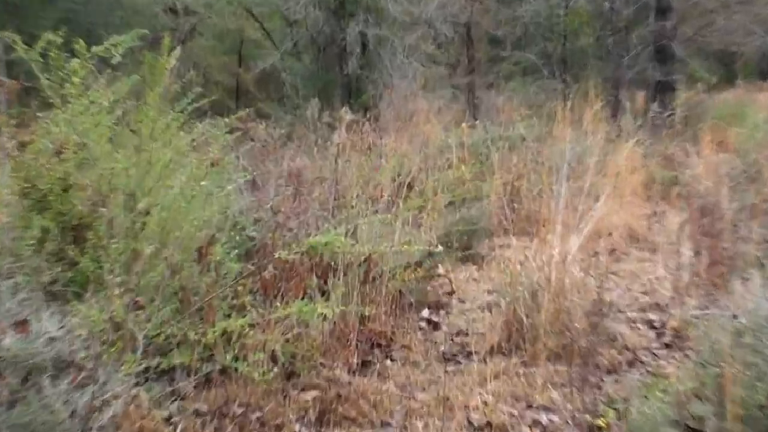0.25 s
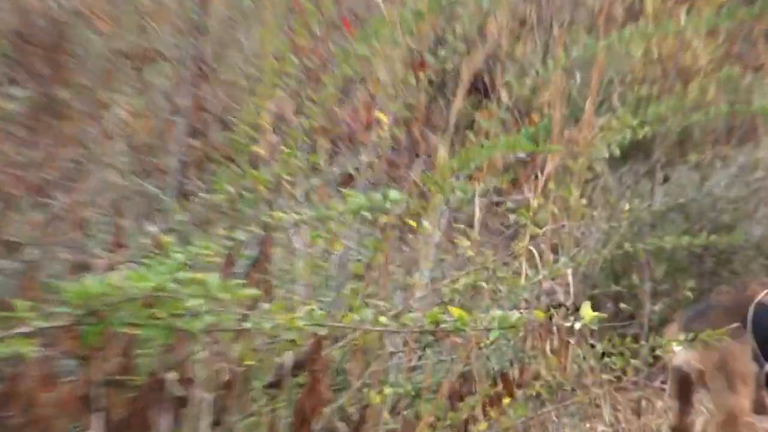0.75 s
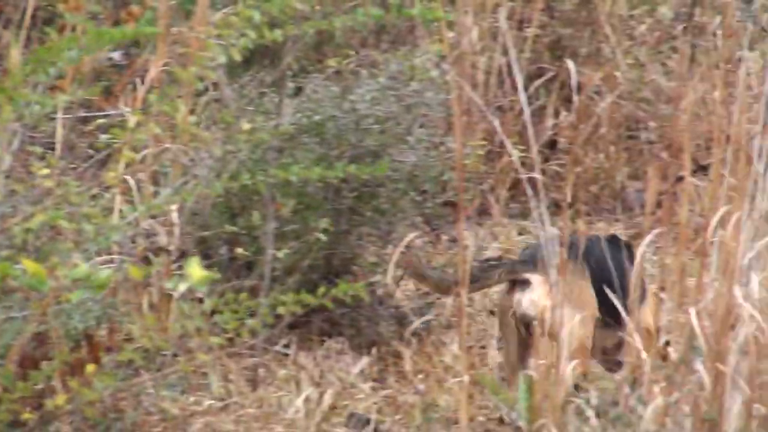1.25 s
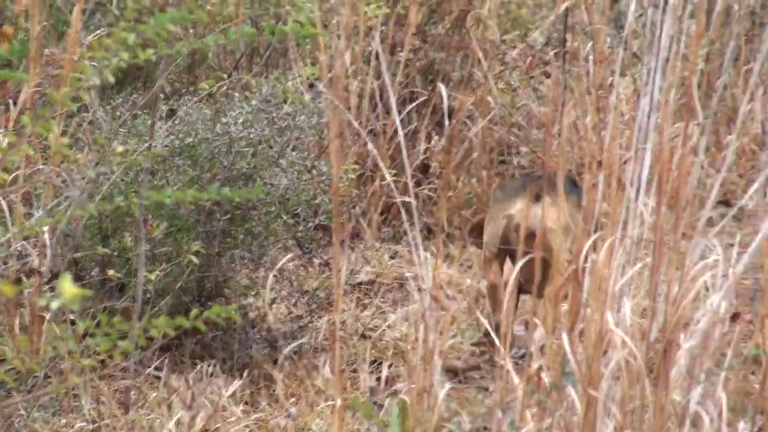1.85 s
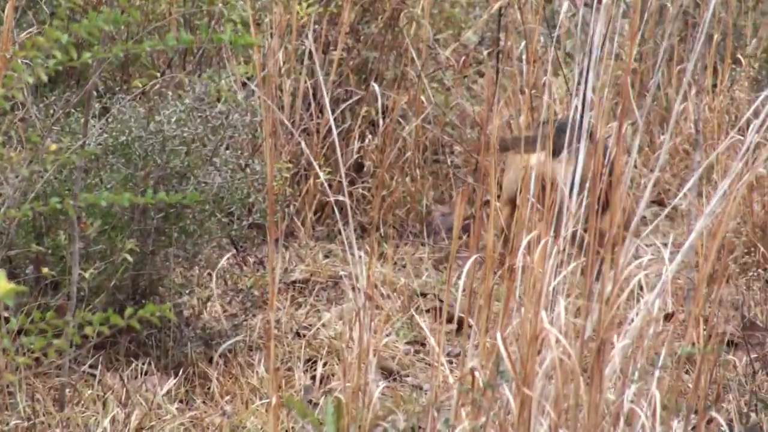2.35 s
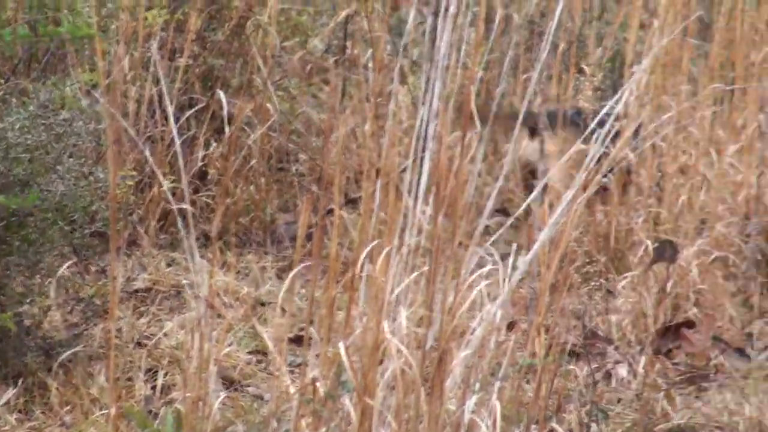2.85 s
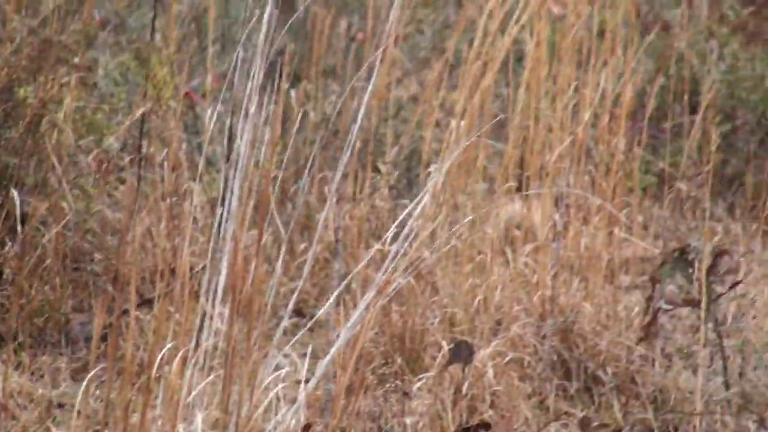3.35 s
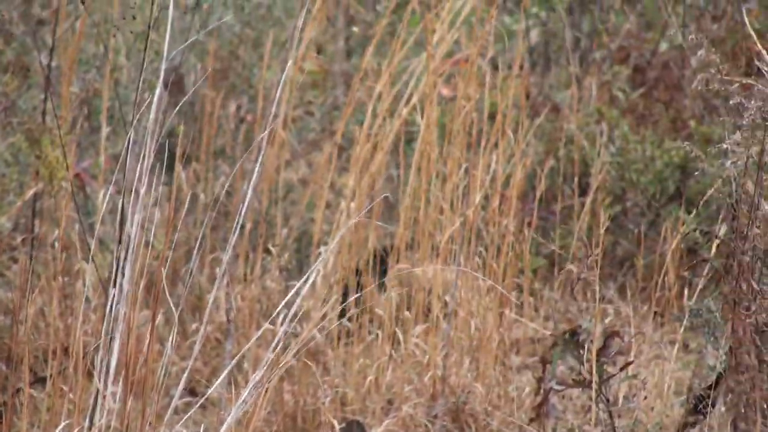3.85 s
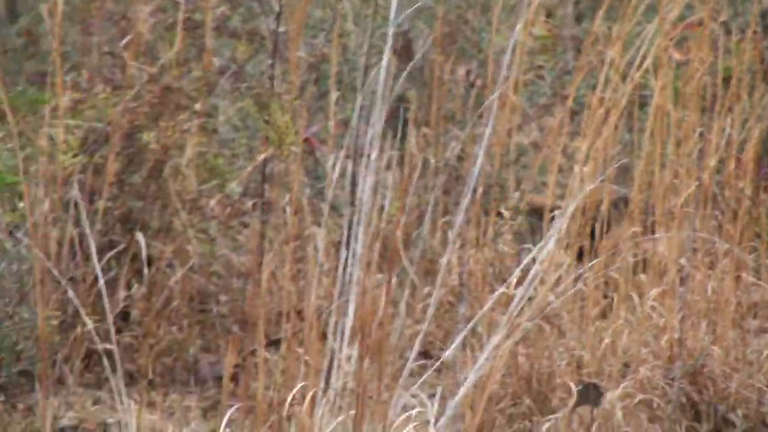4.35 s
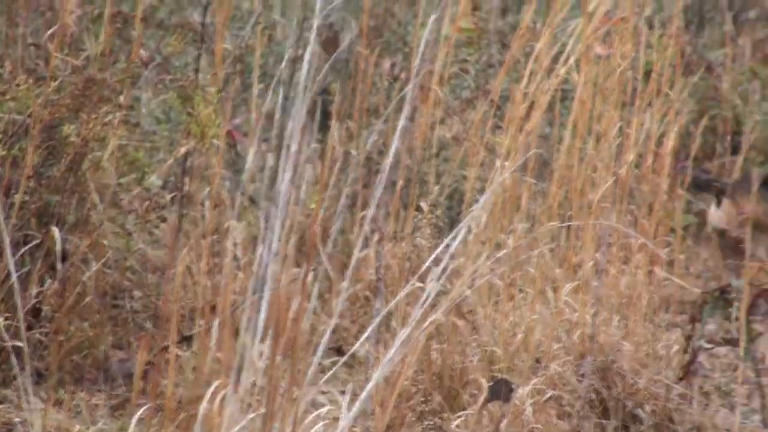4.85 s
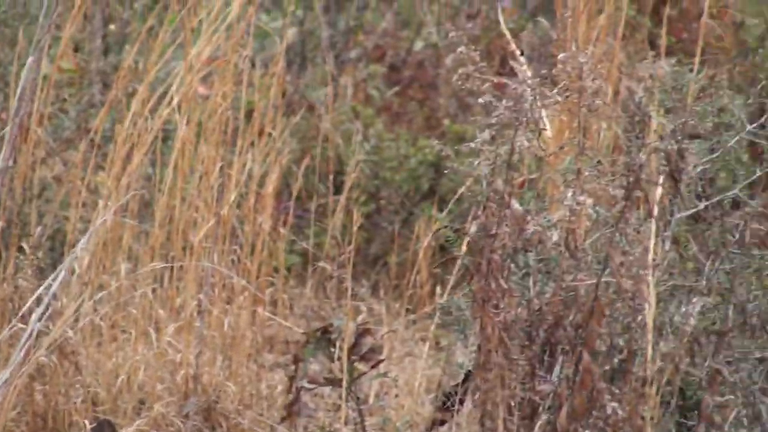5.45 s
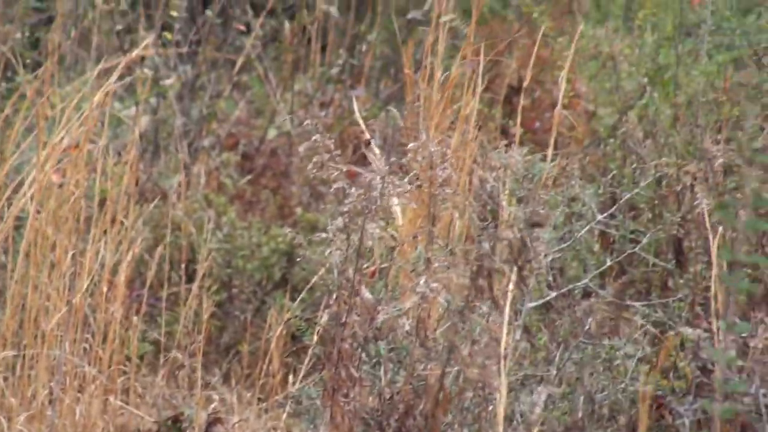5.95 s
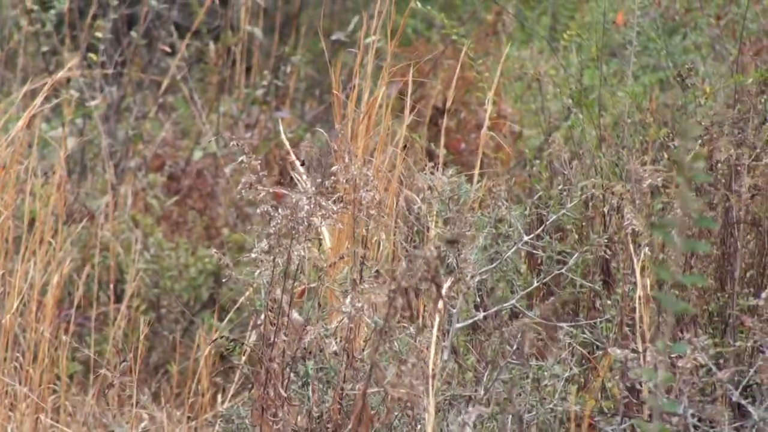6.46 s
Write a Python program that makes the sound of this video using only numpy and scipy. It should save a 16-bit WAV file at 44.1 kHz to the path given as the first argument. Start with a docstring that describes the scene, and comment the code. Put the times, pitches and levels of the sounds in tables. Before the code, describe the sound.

A hunting hound bays repeatedly while working away through dry brush. The calls are brief, hollow and midrange, with hoarse, growling edges and a ringing tail from the woods. Faint far yelps fill some early gaps; twigs break with dry snaps and dull thuds. Wide, quiet field hush and gusty low microphone rumble lie underneath, and the later bays grow weaker and more distant.

```python
"""A beagle bays thirteen times while it works away through dry grass in an overgrown field.
Each bay starts low and reedy, breaks up to a clear note, turns hoarse in places and drops off.
The voice is a sum of harmonics with growling sidebands and pulsed noise; a noise response makes the tree line's echo.
A second hound yelps faintly in arched tones, twigs snap and grass crackles in short noise bursts.
Coloured noise makes the whistling breath, the breeze rumbling on the microphone and the hush of the field."""
import sys
import numpy as np
from scipy import signal
from scipy.fft import rfft, irfft
from scipy.io import wavfile
from scipy.ndimage import uniform_filter1d

SR = 44100
rng = np.random.default_rng(int(sys.argv[2]) if len(sys.argv) > 2 else 0)


def to_wav(sig):
    """Store sig (one row per channel, or 1-D mono) as 16-bit WAV at the path in sys.argv[1].

    Samples outside -1..1 are clipped; the rate is SR.
    """
    pcm = np.clip(np.atleast_2d(sig), -1, 1) * 32767
    pcm = np.round(pcm).astype(np.int16)
    wavfile.write(sys.argv[1], SR, pcm.T)  # frames by channels


N = 295022
TIME = np.arange(N) / SR

# the bays, levels before the shared shape and the mix: (start [s], length [s], time until the voice breaks up [s],
# pitch after the break [Hz], pitch before the drop [Hz], level [dB], push of breath after the break [dB],
# time to the push's peak [s], sag over the note [dB], second harmonic's own level [dB],
# lift of the upper harmonics [dB], rasp of the break [dB])
BAYS = [ (0.289, 0.16, .028, 661.9, 662, -19, 0, 0.012, -4.5, -30, 0.5, -10),
        (0.807, 0.16, .026, 681.8, 704.3, -13.5, 1.5, 0.0034, -9, -34.5, 1.5, -23),
        (1.239, 0.16, .026, 675.8, 704, -14, 0.5, 0.011, -8.5, -31, -0.5, -10),
        (1.795, 0.14, .021, 676.5, 704.8, -15, 3.5, 0.011, -9.5, -30, -1, -16),
        (2.322, .160, .006, 656.7, 692.3, -18.5, 6.5, .017, -10.5, -37.5, -1.5, -26.5),
        (2.744, 0.17, .018, 630.8, 706.4, -20, 3.5, 0.0069, -3, -35, 0, -28),
        (3.227, 0.16, .024, 666, 679.5, -17, 0, 0.0057, -10.5, -38, -2.5, -19),
        (3.672, 0.17, .032, 665, 687.2, -16, 0, .009, -9, -38, -3, -16.5),
        (4.251, .172, .030, 690.5, 684.5, -21, 6.5, 0.0073, -1.5, -42.5, 1, -20),
        (4.822, 0.15, .014, 682.8, 732.6, -21.5, -3, 0.0079, -8.5, -33.5, 1.5, -23.5),
        (5.212, .170, .023, 688.8, 689.6, -20, -1.5, 0.015, -7, -41.5, -2.5, -26),
        (5.774, 0.14, .009, 635.4, 711.6, -31.5, 7.5, 0.018, -5, -40.5, 3, -25),
        (6.256, 0.15, .017, 685.8, 719, -25.5, 4, .013, -8.5, -48, -2, -15), ]


def undb(db):
    """Decibels to gain."""
    return 10 ** (np.asarray(db) / 20)


def gain_at(hz, points):
    """Gain of a (frequency [Hz], level [dB]) spectrum at any frequency."""
    f, db = np.transpose(points)
    return undb(np.interp(np.log(np.maximum(hz, 1)), np.log(f), db))


def colour(x, points):
    """Filter a sound by a (frequency [Hz], level [dB]) spectrum."""
    spectrum = rfft(x) * gain_at(np.fft.rfftfreq(x.shape[-1], 1 / SR), points)
    return irfft(spectrum, x.shape[-1])


def unit(x):
    """Scale to rms 1."""
    return x / np.sqrt(np.mean(x ** 2))


def noise(points):
    """Coloured noise of rms 1."""
    return unit(colour(rng.standard_normal(N), points))


def walk(rate):
    """Smooth random curve of rms 1 that changes about rate times a second."""
    size = max(int(SR / rate), 2)
    smooth = uniform_filter1d(rng.standard_normal(N), size)
    return unit(uniform_filter1d(smooth, size))


def window(start, end, edge):
    """1 between two times, with ramps of edge seconds."""
    return np.clip(np.minimum(TIME - start, end - TIME) / edge + .5, 0, 1)


def stereo(mid, side):
    """Left and right from mid and side."""
    return np.array([mid + side, mid - side])


def field(field_db=-54):
    """Soft, wide, steady hush of the open country."""
    # colour of the still field: (frequency [Hz], relative level [dB])
    hush = [(18, -33.5), (30, -0.5), (64, -10.5), (124, -18), (415, -14.5), (616, -2.5), (702, -1),
            (760, -14), (889, -13.5), (1390, -16), (1670, -19.5), (2230, -21), (3310, -27), (13300, -37.5),
            (16000, -36)]
    # width of the hush: (frequency [Hz], side against mid [dB])
    hush_width = [(100, -12.5), (700, -7.5), (5000, -1), (10500, -4.5), (11800, -32.5)]
    return undb(field_db) * stereo(noise(hush), colour(noise(hush), hush_width))


def breeze(mid_db=1, side_db=-0.5, buffet_db=3.5, mid_swell_db=5, side_swell_db=12, lag_s=0.032, swell_s=0.011):
    """Eddies rumble on the microphone; the rumble swells and widens with each bay."""
    # strength of the breeze before buffets and swells: (time [s], level [dB])
    gusts = [(0, -54.5), (.45, -49), (.7, -52.5), (1.2, -59), (1.3, -46.5), (1.68, -43.5), (2.15, -59),
             (2.45, -51), (3.55, -60), (3.8, -50.5), (4.2, -70), (4.35, -55.5), (5.3, -49.5), (5.55, -58),
             (5.65, -79), (6, -80), (6.13, -54.5), (6.69, -65)]
    # colour of the rumble in mid and in side: (frequency [Hz], relative level [dB])
    rumble_mid = [(12, -25.5), (28, -21), (50, 4), (150, -3.5), (380, -20), (1500, -84.5)]
    rumble_side = [(12, -28), (28, -13), (60, 4), (160, -3.5), (400, -21), (2000, -65)]
    gust = undb(np.interp(TIME, *np.transpose(gusts)) + buffet_db * walk(52))
    late_baying = np.interp(TIME - lag_s, TIME, baying())
    swell = uniform_filter1d(late_baying, int(swell_s * SR))
    mid = undb(mid_db + mid_swell_db * swell) * noise(rumble_mid)
    side = undb(side_db + side_swell_db * swell) * noise(rumble_side)
    return gust * stereo(mid, side)


def grass(rate=130, grass_db=-75, spread_db=3, fade_db=-6, grain_s=0.0006):
    """Dry stalks crackle in bunches of tiny decaying grains under the dog, fainter as it leaves."""
    # colour of the dry stalks: (frequency [Hz], relative level [dB])
    stalks = [(1000, -11.5), (3800, -1), (8000, -7.5), (15000, -18.5)]
    strengths = undb(spread_db * np.minimum(rng.exponential(size=N), 4))
    grains = (rng.random(N) < rate / SR) * strengths
    decaying = signal.lfilter([1], [1, -np.exp(-1 / (grain_s * SR))], grains)
    bunched = decaying * undb(4.1 * walk(6))
    crackle = unit(bunched * stereo(noise(stalks), .5 * noise(stalks)))
    return crackle * undb(grass_db + fade_db * TIME / TIME[-1])


def twigs(snap_s=0.0029, thud_s=0.007):
    """Each break is a burst of cracking fibres, heard as a dry snap over a dull thud in the litter."""
    # snapping twigs and steps: (time [s], snap level before colouring [dB], thud level before colouring [dB])
    breaks = [(1.1837, -56, -75), (2.5505, -55, -33), (2.562, -54, -34), (2.601, -59, -44),
              (3.7918, -53, -70), (4.037, -62, -46)]
    # colours of the two parts: (frequency [Hz], relative level [dB])
    snap_colour = [(1000, -12), (3800, -3), (5300, 3), (6200, -7), (8000, -7), (11000, -22), (15000, -36)]
    thud_colour = [(60, -6), (220, 8.5), (450, 5.5), (1100, -2.5), (1450, -13), (2600, -14), (3600, -40),
                   (12000, -49.5)]
    snap, thud = np.zeros(N), np.zeros(N)
    for start, snap_db, thud_db in breaks:
        age = np.maximum(TIME - start, 0)
        snap += undb(snap_db) * np.exp(-age / snap_s) * (age > 0)
        thud += undb(thud_db) * np.exp(-age / thud_s) * (age > 0)
    total = np.zeros(N)
    for burst, tone in ((snap, snap_colour), (thud, thud_colour)):
        crack = unit(colour(burst * rng.standard_normal(N), tone))
        total += crack * np.sqrt(np.mean(burst ** 2))  # colouring keeps the energy of the bursts
    return total


def far_hound(arch=0.067, waver=0.027):
    """Short arched yelps of five harmonics from deep in the brush."""
    # yelps: (start [s], end [s], first pitch before arching [Hz], last pitch before arching [Hz], level [dB])
    yelps = [(0.094, 0.22, 594, 568, -52.5), (0.717, 0.818, 495, 581, -52), (1.689, 1.743, 496, 571.5, -51),
             (2.04, 2.116, 549, 496, -47.5)]
    # strength of the harmonics: (frequency [Hz], relative level [dB])
    yelp_colour = [(500, -1), (1050, 1.5), (1600, -6.5), (2150, -6.5), (2800, -29.5)]
    hz, loudness = np.zeros(N), np.zeros(N)
    for start, end, first_hz, last_hz, db in yelps:
        inside = (TIME > start) & (TIME < end)
        part = (TIME[inside] - start) / (end - start)
        swell = np.sin(np.pi * part)
        glide_hz = first_hz + (last_hz - first_hz) * part
        hz[inside] = glide_hz * (1 + arch * (swell - 2 / 3))
        loudness[inside] = undb(db) * swell
    phase = 2 * np.pi * np.cumsum(hz * (1 + waver * walk(270))) / SR
    return loudness * sum(gain_at(k * hz, yelp_colour) * np.sin(k * phase) for k in range(1, 6))


def tree_line(t60=1.0, build_s=0.0074, trees_s=0.18, trees_width_s=0.082, trees_db=-4, near_db=4, near_s=0.073):
    """Echo response: brush close by scatters first, then the trunks send back a soft, late cluster."""
    # colour of the echo: (frequency [Hz], relative level [dB])
    woods = [(300, -11.5), (640, 2), (710, 3.5), (800, 4.5), (1400, 3), (2200, 12), (2900, 14), (7000, -17)]
    decay = undb(-60 * TIME / t60) * (1 - np.exp(-TIME / build_s))
    brush = undb(near_db) * np.exp(-TIME / near_s) * (TIME > .008)
    trunks = undb(trees_db) * np.exp(-((TIME - trees_s) / trees_width_s) ** 2)
    response = rng.standard_normal(N) * (decay + brush + trunks)
    return colour(response / np.sqrt(np.sum(response ** 2)), woods)[:2 * SR]


def echoes(dog, echo_db=-25, gain_away_db=8.0, side_db=-13, earlier_db=3):
    """The woods keep ringing as the dog moves off; a bay from just before is still dying away."""
    # one second of lead-in holds the earlier bay, a copy of the third
    call = np.concatenate([np.zeros(SR), dog * undb(gain_away_db * TIME / TIME[-1])])
    bay_start, bay_length = BAYS[2][:2]
    start, end = int(bay_start * SR), int((bay_start + bay_length) * SR)
    before = SR * 7 // 9
    call[before:before + end - start] += undb(earlier_db) * dog[start:end]
    mid, side = (signal.fftconvolve(call, tree_line())[SR:SR + N] for _ in range(2))
    return undb(echo_db) * stereo(mid, undb(side_db) * side)


def baying():
    """1 while the dog gives voice, else 0; the voice starts within two cycles and dies over several."""
    voiced = np.zeros(N)
    for start, length, *_ in BAYS:
        voiced += window(start + .001, np.inf, .003) * window(0, start + length, .01)
    return voiced


def whistle(hiss_db=-60, fade_db=-15, ragged_db=4, linger_s=0.021):
    """Narrow bands of air flare up unevenly in each bay; the grass swallows them as the dog leaves."""
    # air whistling past the teeth: (centre [Hz], width [Hz], relative level [dB])
    teeth = [(6380, 950, -8.5), (7300, 1100, -12), (8200, 720, -13.5), (11300, 2500, -13)]
    keep = np.exp(-1 / (linger_s * SR))
    flow = signal.lfilter([1 - keep], [1, -keep], baying())
    air = np.zeros(N)
    for hz, width, db in teeth:
        skirt = [(hz - 2 * width, -50), (hz - width / 2, -6), (hz, 0), (hz + width / 2, -6), (hz + 2 * width, -50)]
        air += noise(skirt) * undb(db + ragged_db * walk(45))
    return flow * air * undb(hiss_db + fade_db * TIME / TIME[-1])


def bay_shapes():
    """Pitch, level, second harmonic against the first, brightness and break rasp, on one shape for all bays."""
    reedy_pitch, reedy_rise = .785, .075  # share of the note's pitch at the start, and gain before the break
    # reedy start under the note; lower still at the very start; its second harmonic against the first
    reedy_under_db, attack_db, reedy_second_db = -8, -15, -4.5
    break_width_s, crack_s = 0.015, .008  # duration of the jump up; the rasp's spread either side of it
    pure_db, opening_s = -8.5, .02  # the second harmonic starts weak and grows as the mouth opens
    # pitch and levels fall as the breath runs out
    drop_s, drop_share, release_db, second_release_db = .042, .33, -10.5, -12.5
    hz = np.full(N, 500.)
    level_db, second_db, bright_db, crack = np.zeros((4, N))
    for (start, length, break_s, first_hz, last_hz, db, push_db, push_s,
         sag_db, overtone_db, upper_db, crack_db) in BAYS:
        on = (TIME > start - .01) & (TIME < start + length + .01)
        age = TIME[on] - start
        since = age - break_s
        rise = np.clip(age / break_s, 0, 1)
        clear = np.clip(since / break_width_s + .5, 0, 1)
        held = np.clip(since / (length - break_s - drop_s), 0, 1)
        drop = np.clip((age - length) / drop_s + 1, 0, 1) ** 2
        note_age = np.maximum(since, 0)
        push = note_age / push_s * np.exp(1 - note_age / push_s)

        reedy_hz = first_hz * (reedy_pitch + reedy_rise * rise)
        held_hz = last_hz + (first_hz - last_hz) * (1 - held) ** 2
        note_hz = held_hz * (1 - drop_share * drop)
        hz[on] = (1 - clear) * reedy_hz + clear * note_hz

        reedy_db = reedy_under_db + attack_db * (1 - rise) ** 2
        level_db[on] = db + (1 - clear) * reedy_db + push_db * push + sag_db * held + release_db * drop ** 2
        note_second_db = overtone_db + pure_db * np.exp(-note_age / opening_s) + second_release_db * drop
        second_db[on] = (1 - clear) * reedy_second_db + clear * (note_second_db - level_db[on])
        bright_db[on] = upper_db
        crack[on] = undb(crack_db) * np.exp(-(since / crack_s) ** 2)
    return hz, level_db, second_db, bright_db, crack


def beagle(jitter=0.0049, rasp_jitter=.08, rasp_db=-2, hoarse_db=-32, upper_db=-0.5, brightening=0.9, flutter_db=2,
           attack_s=0.048, attack_db=7.5, ground_db=6, smear=0.062, edge_db=-45, edge_attack_db=7, edge_rasp_db=-32):
    """Vocal folds with a strong fundamental, sidebands where they growl, and pulsed noise where they rasp."""
    # hoarse stretches, where the dog strains and the folds beat against a slower vibration and rasp:
    # (start [s], end [s], slower rate [share of the pitch], sideband level before the throat [dB],
    # rasp before its overall level [dB], extra effort [dB])
    growls = [(0.323, 0.34, .5, -27, -6, 4), (0.348, .374, .49, -15.5, -16, 5.5),
              (0.417, .45, .46, -15, -25, 4), (.86, 0.891, .44, -17, -17, 0.5),
              (1.299, 1.329, .36, -17.5, -26.5, 0), (1.364, 1.376, 0.62, -10, -25, -3),
              (1.914, 1.926, .5, -18.5, -7, -0.5), (2.378, 2.462, .32, -7, -10.5, 1),
              (2.821, 2.859, 0.47, -11.5, -9.5, 1), (3.292, 3.358, .49, -13, -7, 0),
              (3.727, 3.793, .35, -19, -28.5, 1), (4.299, 4.399, 0.5, -23.5, -21.5, -1),
              (4.907, 4.927, 0.55, -22.5, -9, 2), (5.268, 5.32, .46, -17.5, -8.5, -2),
              (5.873, 5.915, 0.57, -25, -6.5, -5)]
    # strength of the upper partials: (frequency [Hz], relative level [dB])
    throat = [(1000, 1.5), (1400, -15), (1700, -19), (1980, -31.5), (2160, -25.5), (2500, -34.5),
              (2900, -37), (3300, -51), (4400, -61.5)]
    # colour of the rasp in the mouth: (frequency [Hz], relative level [dB])
    mouth = [(300, -43.5), (480, -17.5), (620, 9.5), (880, 0.5), (1120, -5.5), (1420, -11.5), (1800, -33),
             (2500, -30.5), (3300, -51.5), (9000, -77.5)]
    # breathy edge that runs through the whole bay: (frequency [Hz], relative level [dB])
    breathy_edge = [(1200, 3.5), (1650, 6), (1950, -3.5), (2400, -1), (2850, -3), (3300, -19.5),
                    (9000, -51.5)]
    hz, level_db, second_db, bright_db, crack = bay_shapes()
    effort_db, rasp = np.zeros(N), crack
    for start, end, _, _, growl_rasp_db, strain_db in growls:
        effort_db += strain_db * window(start, end, 0.017)
        rasp = rasp + undb(growl_rasp_db) * window(start, end, 0.0045)
    loudness = undb(level_db + effort_db) * baying()
    second_db = second_db - effort_db  # effort leaves the second harmonic's own level alone
    attack = sum(window(start - .02, start + attack_s, 0.008) for start, *_ in BAYS)

    # cycle lengths scatter far more while the voice breaks or rasps
    phase = 2 * np.pi * np.cumsum(hz * (1 + (jitter + rasp_jitter * rasp) * walk(420))) / SR
    voice = np.sin(phase) + undb(second_db) * np.cos(2 * phase)

    # sharp closure of the folds lifts the upper harmonics with the second, most in the hard attack;
    # with distance the soft ground takes more from the fundamental than from them
    distance_db = ground_db * (TIME / TIME[-1]) ** 2
    closure_db = upper_db + bright_db + brightening * second_db + attack_db * attack + distance_db
    for k in range(3, 8):
        strength = undb(closure_db + flutter_db * walk(86)) * gain_at(k * hz, throat)
        smeared_phase = phase + smear * (1 + attack) * walk(230)
        voice += strength * np.sin(k * smeared_phase)

    # the slower vibration puts lines between the harmonics; the throat passes none below the note
    beat, depth = np.zeros(N), np.zeros(N)
    for start, end, share, sideband_db, *_ in growls:
        active = window(start, end, 0.0091)
        beat[active > 0] = share
        depth += undb(sideband_db) * active
    slow_phase = 2 * np.pi * np.cumsum(hz * beat * (1 + 0.038 * walk(200))) / SR
    for k in range(1, 4):
        voice += depth * gain_at((k + beat) * hz, throat) * np.sin(k * phase + slow_phase)

    # air escapes once a cycle
    puffs = rng.standard_normal(N) * (1 + np.cos(phase))
    rasp_gain = undb(hoarse_db) + undb(rasp_db) * rasp
    edge_gain = undb(edge_db + edge_attack_db * attack) + undb(edge_rasp_db) * rasp
    voice += rasp_gain * unit(colour(puffs, mouth))
    voice += edge_gain * unit(colour(puffs, breathy_edge))
    return loudness * voice


def scene(dog_db=3.0, lean=.04, lead=0.098):
    """Dog, breath, far hound and twigs sit nearly ahead, a touch louder and earlier on the left."""
    dog = undb(dog_db) * beagle()
    ahead = dog + whistle() + far_hound() + twigs()
    # the quarter-turn part of the side signal sets the left ahead in phase
    side = lean * ahead - lead * signal.hilbert(ahead).imag
    return stereo(ahead, side) + echoes(dog) + grass() + breeze() + field()


def record(dry):
    """A steep elliptic low-pass cuts the top of the treble."""
    top_hz = 16150
    low_pass = signal.ellip(12, .2, 80, top_hz, fs=SR, output="sos")
    return signal.sosfilt(low_pass, dry)


dry = scene()
out = record(dry)
to_wav(out)
```